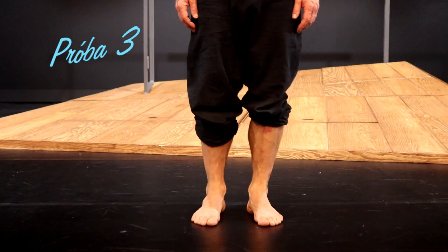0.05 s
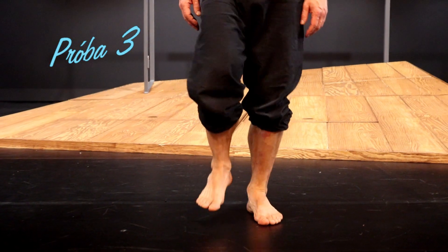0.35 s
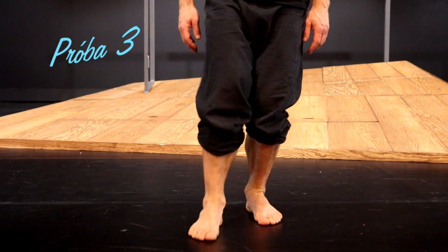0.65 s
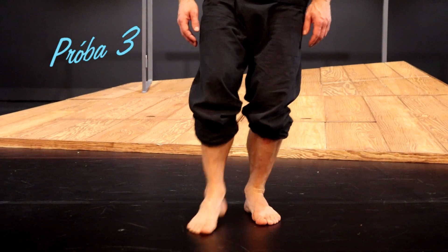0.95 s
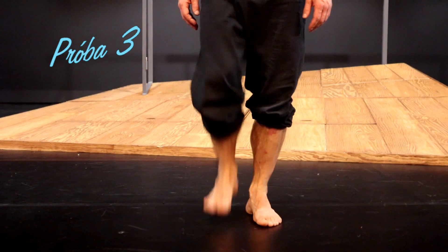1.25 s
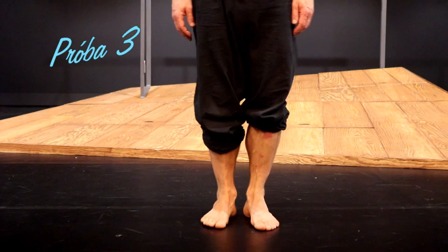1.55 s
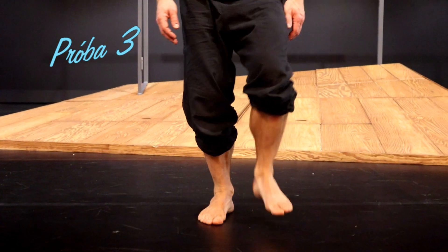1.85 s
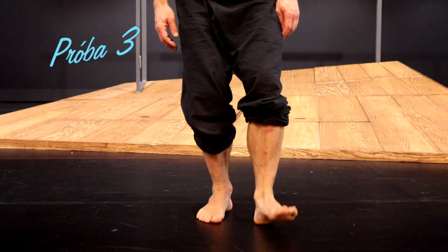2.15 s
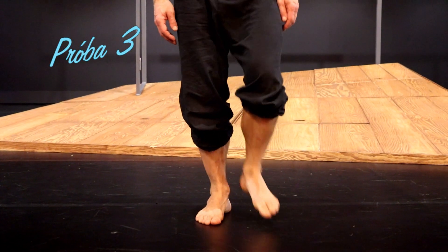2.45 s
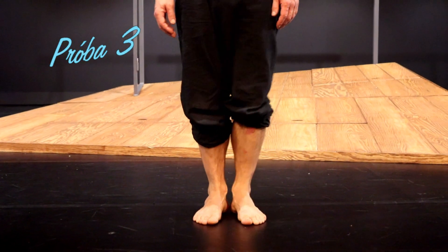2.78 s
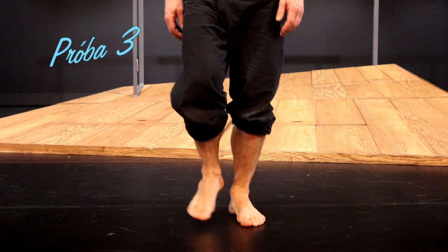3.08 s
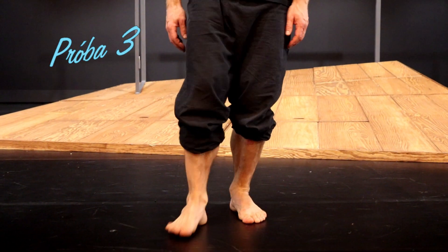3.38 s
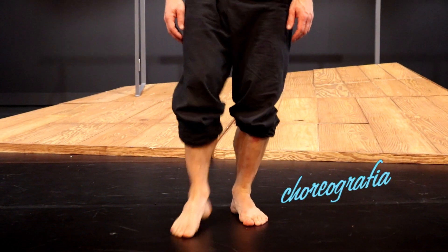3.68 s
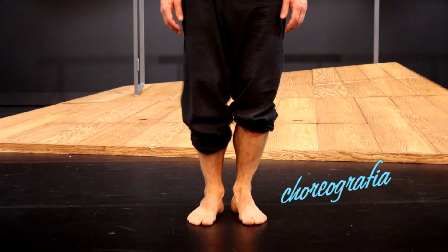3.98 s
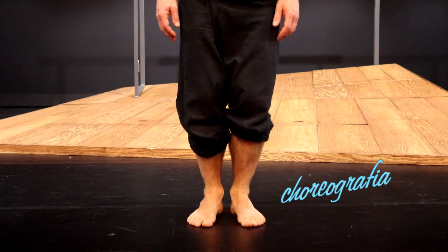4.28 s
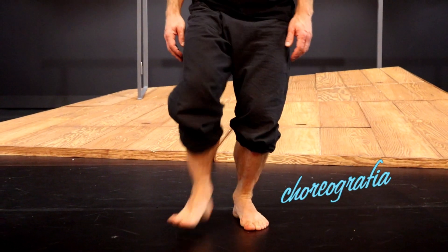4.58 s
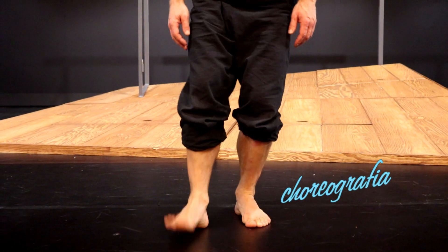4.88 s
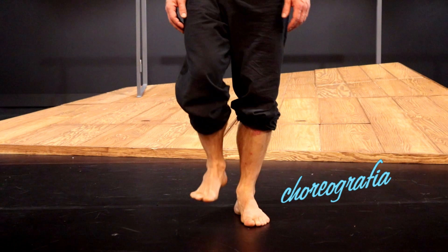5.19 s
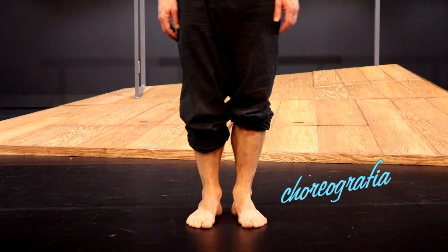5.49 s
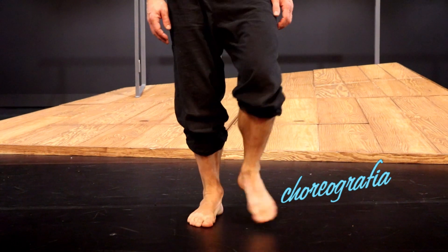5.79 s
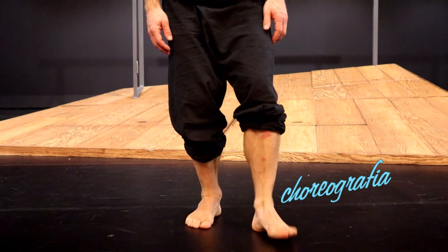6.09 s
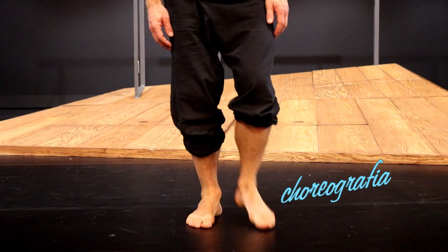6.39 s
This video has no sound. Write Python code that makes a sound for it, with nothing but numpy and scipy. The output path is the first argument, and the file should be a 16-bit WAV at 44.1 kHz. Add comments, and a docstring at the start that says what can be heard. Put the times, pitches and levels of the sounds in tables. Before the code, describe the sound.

A barefoot dancer repeats a three-beat figure five times on a sprung stage floor: a flat stamp, a lighter scuff, then a step into place. Skin slaps and pops sharply while the boards boom under the weight. Soft sole brushes and a few small creaks fall between the beats. The sound is close and in stereo, in a rehearsal room with about a second of reverberation and faint ventilation.

```python
"""Bare feet slap and boom on a sprung stage floor, close up and in stereo: one dancer repeats a three-beat
figure, a flat stamp forward, a scuff as the foot swings back, a step into place, then the other foot.
Skin slaps the mat and squeezes out pockets of air, the weight of the leg booms in the deck,
and a rehearsal room with a faint ventilation rush answers for about a second."""
import sys
import numpy as np
from scipy import signal
from scipy.fft import rfft, irfft, next_fast_len
from scipy.io import wavfile
from scipy.ndimage import uniform_filter1d

SR = 44100
rng = np.random.default_rng(int(sys.argv[2]) if len(sys.argv) > 2 else 0)


def transcribe(signal):
    """Save signal, clipped to [-1, 1], as a 16-bit WAV file at the path in sys.argv[1]."""
    frames = np.atleast_2d(signal).T
    limited = np.clip(frames, -1, 1)
    pcm = np.round(limited * 32767).astype(np.int16)
    wavfile.write(sys.argv[1], SR, pcm)


N = 292824
WEIGHT_LAG_S = 0.0062  # in stamps and scuffs the weight lands this long after the first slap


def amp(db):
    """Decibels to gain."""
    return 10 ** (np.asarray(db) / 20)


def unit(x):
    """x at rms 1."""
    return x / np.sqrt(np.mean(x ** 2) + 1e-20)


def per_ms(x):
    """x with the energy of one millisecond at full level."""
    return x / np.sqrt(np.sum(x ** 2) / (SR / 1000) + 1e-20)


def along(points, hz):
    """Read a curve of (f/Hz, value) points on a log frequency axis."""
    f, v = np.transpose(points)
    return np.interp(np.log(hz + 1), np.log(f), v)


def add(track, s, sound):
    """Mix a sound into the track at s seconds."""
    part = track[..., max(round(s * SR), 0):][..., :sound.shape[-1]]
    part += sound[..., :part.shape[-1]]


def filtered(x, response):
    """x through a frequency response."""
    n = x.shape[-1]
    m = next_fast_len(n + 8192)
    return irfft(rfft(x, m) * response(np.fft.rfftfreq(m, 1 / SR)), m)[..., :n]


def shaped(x, gain):
    """Minimum-phase EQ, so nothing rings ahead of an attack."""
    m = 2 * next_fast_len(len(x))
    cepstrum = irfft(np.log(gain(np.fft.rfftfreq(m, 1 / SR) + 1) + 1e-6))
    cepstrum[1:m // 2] *= 2
    cepstrum[m // 2 + 1:] = 0
    return irfft(rfft(x, m) * np.exp(rfft(cepstrum)))[:len(x)]


def coloured(x, points):
    """x through an EQ curve of (f/Hz, level/dB) points."""
    return shaped(x, lambda hz: amp(along(points, hz)))


def crackle(envelope, passes=6):
    """A random burst of energy 1, by turns flattened in spectrum and clipped to the envelope."""
    x = envelope * rng.standard_normal(len(envelope))
    limit = 2.5 * envelope / np.linalg.norm(envelope)
    for _ in range(passes):
        x = irfft(np.exp(1j * np.angle(rfft(x))), len(x))
        x = np.clip(x, -limit, limit)
    return x / np.linalg.norm(x)


def diffuse(n):
    """White stereo noise as a room delivers it: alike in the bass, unrelated in the treble."""
    # stereo image of the room: f/Hz, left-right correlation
    likeness = [(60, 1), (290, 0.92), (640, 0.72), (1400, 0.27), (3000, 0)]
    angle = lambda hz: np.arccos(np.clip(along(likeness, hz), -1, 1)) / 2
    spread = lambda hz: np.array([np.cos(angle(hz)), np.sin(angle(hz))])
    mid, side = filtered(rng.standard_normal((2, n)), spread)
    return np.array([mid + side, mid - side])


def ventilation(level_db=-50):
    """Room tone: a faint, steady rush of air."""
    # colour of the rush: f/Hz, level/dB
    rush_eq = [(12, -54), (20, -6), (120, -1), (285, -7.5), (446, -8.5), (485, -5.5), (527, -8.5),
               (759, -17), (849, -17.5), (2320, -21.5), (2750, -24.5), (3160, -21), (16000, -36.5)]
    return amp(level_db) * unit(filtered(diffuse(N), lambda hz: amp(along(rush_eq, hz))))


def in_room(sound, room_db=0, build_up_s=0.031, early_t60=0.039, wall_s=0.151, wall_db=-3, wall_t60=0.19):
    """A close sound, its early scatter and the room's tail, which is new for every spot on the floor."""
    # decay of the tail: f/Hz, t60/s
    tail_t60 = [(50, 1.15), (200, 1.13), (600, 0.83), (2000, 0.87), (4000, 0.87), (8000, 0.7), (15000, .36)]
    # colour of the tail: f/Hz, level/dB
    tail_eq = [(40, -1.5), (200, -6.5), (500, -5), (800, -1.5), (1100, 0), (2200, -7), (4500, -8.5),
               (8000, -15), (15000, -17.5)]
    # scatter off floor and legs: f/Hz, level/dB
    early_eq = [(200, -10.5), (750, -2.5), (1100, 4), (1600, 0.5), (2100, -8), (4000, -5.5), (15000, -21)]
    # colour mismatch of the two microphone ports: f/Hz, left minus right/dB
    balance = [(60, 1), (900, 1.4), (1900, -1), (3300, -4.5), (4800, 4), (7500, -2.5), (10000, 1.5),
               (13000, -10.5), (15000, -4)]
    hz, t, noise = signal.stft(diffuse(SR), SR, nperseg=256)

    def decay(eq, t60):
        return amp(along(eq, hz)[:, None] - 60 * t / t60) * np.sqrt(2 * np.log(1000) / (t60 * SR))

    late = amp(room_db) * decay(tail_eq, along(tail_t60, hz)[:, None]) * (1 - np.exp(-t / build_up_s))
    late *= np.hypot(1, amp(wall_db - 60 * np.abs(t - wall_s) / wall_t60))  # the far wall answers
    early = decay(early_eq, early_t60) * (t > 0)
    impulse = signal.istft(noise * np.hypot(late, early), SR, nperseg=256)[1]
    heard = signal.fftconvolve(sound[None], impulse, axes=1)
    lead_s = 0.5 / SR  # the right port hears first
    log_ratio = lambda f: np.log(amp(along(balance, f))) - 2j * np.pi * f * lead_s
    add(heard, 0, filtered(sound, lambda f: np.exp(np.outer([0.5, -0.5], log_ratio(f)))))
    return heard


def creak(length):
    """A short run of slips rings a panel joint's two resonances."""
    # body of the joint: f/Hz, level/dB
    joint_eq = [(600, -31), (950, 0.5), (1110, 4), (1280, -9), (1470, 7), (1750, -6), (3500, -32)]
    slips = crackle(np.hanning(round(length * SR)))
    return unit(coloured(slips, joint_eq))


def brush(length, grain_db=3, pressure_db=2, attack=0.064, hold=2.8):
    """The sole slides in fine catches under uneven pressure, and lifts away."""
    # skin friction: f/Hz, level/dB
    friction_eq = [(300, -13), (1500, 6.5), (3000, 6.5), (5000, 2.5), (8000, 4.5), (12000, -5), (16000, -1)]
    n = round(length * SR)
    catches = unit(uniform_filter1d(rng.standard_normal(n), size=60))
    pressure = unit(uniform_filter1d(rng.standard_normal(n), size=500))
    friction = rng.standard_normal(n) * amp(grain_db * catches + pressure_db * pressure)
    progress = np.linspace(0, 1, n)
    stroke = (1 - np.exp(-progress / attack)) * np.cos(np.pi / 2 * progress ** hold) ** 2
    return unit(coloured(friction, friction_eq)) * unit(stroke)


def boom(push_db, length, ring_db, rattle_db, thump_db, rebound=0.41, boards_db=-4, linger_db=-12):
    """The deck dips under the foot, springs back and rings; a longer contact rings it darker."""
    # the deck's low modes: f/Hz, level/dB, t60/s
    deck_modes = [(30.1, -29.5, 4), (58.48, -15, 1.15), (76.9, -16, 1.66), (91.4, -12.5, 1.15),
                  (125.2, -16.5, 0.673), (178.8, -13.5, 0.45), (214.4, -12, 0.21), (267.8, -11, 0.56)]
    # dense modes of the boards: f/Hz, level/dB
    boards_eq = [(20, 3), (45, 2), (80, 2.5), (130, 0.5), (200, 3), (300, 2), (500, -8), (900, -1),
                 (3000, -32.5)]
    # the panel thumping under a flat sole: f/Hz, level/dB
    thump_eq = [(70, -19.5), (140, 1.5), (225, 3.5), (320, -4.5), (450, -13.5), (700, -21), (2000, -54)]
    # its loose edges chattering just after the blow: f/Hz, level/dB
    rattle_eq = [(100, -39), (300, 3.5), (560, 0.5), (780, -9), (1100, -2), (1500, -5.5), (2500, -12),
                 (5000, -26), (16000, -36)]
    t = np.arange(3 * SR // 2) / SR
    decay = lambda t60: amp(-60 * t / t60)
    lobe = lambda start, span: np.sin(np.pi * np.clip((t - start) / span, 0, 1)) ** 2
    push = rebound * lobe(length, 1.58 * length) - lobe(0, length)
    modes = np.zeros(len(t))
    for hz, db, t60 in deck_modes:
        gain = amp(db + rng.normal(0, 0.74))
        modes -= gain * decay(t60) * np.sin(2 * np.pi * hz * rng.normal(1, 0.01) * t)
    boards = unit(coloured(rng.standard_normal(len(t)), boards_eq))
    boards *= amp(boards_db) * (decay(t60=0.28) + amp(linger_db) * decay(t60=1.47))
    force = t * np.exp(-t / (length / 6))  # the heel bites fast and eases off slowly
    ring = signal.fftconvolve(modes + boards, force / force.sum())[:len(t)]
    rise = 1 - np.exp(-t / length)
    burst = crackle((rise * decay(t60=0.09))[:8192])
    thump = per_ms(coloured(burst, thump_eq))
    rattle = unit(coloured(rng.standard_normal(len(t)), rattle_eq)) * decay(t60=0.28) * rise
    blow = amp(push_db) * push + amp(ring_db) * ring + amp(rattle_db) * rattle
    add(blow, 0, amp(thump_db) * thump)
    return blow


def slap(length, pocket_hz, knock_db, pop_db, snap_db, tilt_db, width_hz=600, pop_top_hz=4800,
         overtone=1.61, overtone_db=-11, linger_db=-28, linger_t60=0.062):
    """Skin closes on the mat in a short crackle: a low knock, a pop of trapped air, a bright snap."""
    # knock of the mat: f/Hz, level/dB
    knock_eq = [(60, -29), (250, 7), (400, -4), (580, 3.5), (800, -9), (1300, -7), (4000, -78)]
    # snap of the skin, before tilt_db per octave is added: f/Hz, level/dB
    snap_eq = [(500, -41), (2500, -5.5), (4800, 1), (6200, 2), (7700, 3.5), (10000, -2.5), (16000, -10.5)]
    t = np.arange(4096) / SR
    u = t / (length / 4)
    closing = crackle(u * np.exp(1 - u) + amp(linger_db - 60 * t / linger_t60), passes=3)

    def tone(f):
        mode = lambda hz: 1 / np.hypot(1, (f - hz ** 2 / f) / width_hz)
        pocket = np.hypot(mode(pocket_hz), amp(overtone_db) * mode(overtone * pocket_hz))
        octaves = np.log2(np.maximum(f, snap_eq[0][0]))
        knock = amp(knock_db) * unit(amp(along(knock_eq, f)))
        pop = amp(pop_db) * unit(pocket / np.hypot(1, (f / pop_top_hz) ** 4))
        snap = amp(snap_db) * unit(amp(along(snap_eq, f) + tilt_db * octaves))
        return np.linalg.norm([knock, pop, snap], axis=0)

    return shaped(per_ms(closing), tone)


def weight_shifts(pocket_width_hz=340, leak_hz_per_s=110000):
    """Small foley around the beats: heels sink, soles pop and brush, and a panel joint creaks."""
    # a heel sinks without a slap: t/s, push/dB, contact/s, ring/dB, rattle/dB, thump/dB
    heels = [(0.247, -39, 0.0029, -48, -48.5, -27.5), (1.915, -31, 0.0188, -13, -65, -46),
             (2.757, -8.5, 0.007, -31, -35.5, -21), (4.401, -12, 0.0113, -12, -29.5, -12),
             (5.442, -18.5, 0.0072, -18, -34, -24.5)]
    # air escapes a rolling or peeling sole: t/s, length/s, pocket/Hz, pop/dB, snap/dB, room/dB
    pops = [(0.207, 0.011, 2020, -29.5, -40.5, 8.5), (0.293, 0.0041, 2390, -31, -43, -11),
            (.5605, 0.0019, 1790, -49, -54, -8), (1.456, .0041, 1420, -36, -30, -2),
            (1.478, .0024, 1290, -7, -52, -3.5), (1.4797, 0.0077, 2600, -21, -48, 16),
            (1.7115, .003, 2600, -33.5, -36, -9), (1.741, .003, 1940, -32, -54, -1.5),
            (1.786, 0.0126, 1800, -43.5, -38.5, 15.5), (2.829, 0.0078, 2520, -39, -36.5, 13.5),
            (3.029, 0.02, 3500, -42, -39, 12), (3.145, 0.017, 1587, -46, -44, -3),
            (4.171, 0.0033, 4320, -26.5, -26, -3), (4.41, 0.039, 3350, -28, -55, 12),
            (5.759, 0.011, 2110, -31, -64, 6)]
    # a sole brushes the mat: t/s, length/s, level/dB
    brushes = [(.169, 0.19, -58.5), (1.691, .13, -58), (4.069, 0.12, -48.5), (5.707, 0.052, -51.5),
               (5.74, 0.18, -59.5)]
    # the joint slips: t/s, length/s, level/dB
    creaks = [(2.773, 0.028, -43), (3.949, 0.037, -53.5), (4.138, 0.032, -44), (4.424, 0.02, -34)]
    for s, *blow in heels:
        yield s, in_room(boom(*blow))
    for s, length, pocket_hz, pop, snap, room in pops:
        width = pocket_width_hz + leak_hz_per_s * length  # a slow pocket leaks and rings more broadly
        yield s, in_room(slap(length, pocket_hz, pop - 14, pop, snap, tilt_db=-4, width_hz=width), room)
    for s, length, db in brushes:
        yield s, in_room(amp(db) * brush(length))
    for s, length, db in creaks:
        yield s, in_room(amp(db) * creak(length))


def steps(settle_lag_s=0.0092, settle_db=-12, load_s=0.0024, softening=0.59):
    """Third beat: a dry knock that traps little air; the later the weight, the softer it loads the deck."""
    # the foot is set down: t/s, contact/s, pocket/Hz, knock/dB, snap/dB, tilt/(dB per octave), room/dB,
    # weight lag/s, push/dB, ring/dB, thump/dB
    cues = [(1.4094, 0.0024, 1970, -19, -15, -5, 4, .0024, -18.5, -18, -12.5),
            (2.7395, 0.005, 910, -15.5, -22, -4, -4, 0.00016, -7.5, -21, -9.5),
            (4.0515, 0.0015, 1570, -13.5, -13.5, 7.5, -1, 0.0047, -27, -18, -15.5),
            (4.381, 0.0033, 1830, -19.5, -22, .5, 7, .0068, -7, -10.5, -6.5),
            (5.4183, .0012, 1460, -16.5, -12, 1, -0.5, 0.0011, -26, -30.5, -23)]
    for s, length, pocket_hz, knock, snap, tilt, room, lag, push, ring, thump in cues:
        levels = np.array([knock, knock - 6, snap])  # knock, pop, snap
        yield s, in_room(slap(length, pocket_hz, *levels, tilt), room)
        settle = slap(0.00386, pocket_hz, *(levels + settle_db), tilt_db=-2)  # a second, softer touch
        yield s + settle_lag_s, in_room(settle, room_db=0.5)
        weight = boom(push, load_s + softening * lag, ring, rattle_db=thump - 21.5, thump_db=thump)
        yield s + lag, in_room(weight)


def scuffs(skim_s=0.045, skim_db=-55, slide_s=0.13, load_s=0.004):
    """Second beat: the toes skim, the ball slaps with little weight behind it, the sole slides away."""
    # the ball glances off the mat: t/s, contact/s, pocket/Hz, pop/dB, snap/dB, load/dB, slide/dB, room/dB
    cues = [(1.037, 0.0082, 1920, -17, -22, -26, -46, 2), (2.412, 0.0073, 2620, -21, -26.5, -23, -51, -3.5),
            (3.714, 0.0062, 2420, -12, -18.5, -28.5, -55, 0.5),
            (5.055, 0.006, 2450, -21.5, -36, -33.5, -49, -.5),
            (6.41, 0.0091, 1590, -29, -28, -28.5, -52, -6.5)]
    for s, length, pocket_hz, pop, snap, load, slide, room in cues:
        yield s - skim_s, in_room(amp(skim_db) * brush(skim_s))
        ball = slap(length, pocket_hz, load - 0.1, pop, snap, tilt_db=-1.5, width_hz=750)
        yield s, in_room(ball, room)
        weight = boom(load + 1, load_s, ring_db=load, rattle_db=load - 16, thump_db=load + 8)
        yield s + WEIGHT_LAG_S, in_room(weight)
        yield s, in_room(amp(slide) * brush(slide_s))


def stamps(toe_s=0.00108, arch_s=0.0028, ball_share=0.864, load_s=0.0056):
    """First beat: toes tick, the ball slaps until the arch claps shut on its air, and the deck booms."""
    # the sole rolls down: t/s, toes to ball/s, toes to arch/s, pocket/Hz, ball pop/dB, arch pop/dB,
    # arch snap/dB, tilt/(dB per octave), room/dB, ring/dB, thump/dB
    cues = [(.678, 0.0097, .016, 2070, -12, -8, -17, 1, 1, -19.5, -13.5),
            (2.0756, .0115, .0143, 1970, -37, -13.5, -14, -5, -2.5, -16, -6),
            (3.3929, .0139, 0.017, 1960, -18.5, -10, -9.5, -5.5, 4, -11, -15.5),
            (4.754, .012, .0156, 1880, -12.5, -17.5, -8.5, -6.5, 2.5, -12, -11.5),
            (6.0736, 0.017, 0.019, 2110, -26, -6, -12, 4, 3.5, -12.5, -5.5)]
    for s, to_ball, to_arch, pocket_hz, ball_pop, arch_pop, snap, tilt, room, ring, thump in cues:
        toes = slap(toe_s, pocket_hz, knock_db=-31, pop_db=-37, snap_db=-26, tilt_db=-3.5)
        yield s, in_room(toes, room)
        ball_s = max(ball_share * (to_arch - to_ball), toe_s)
        ball = slap(ball_s, pocket_hz, knock_db=-18.5, pop_db=ball_pop, snap_db=-16, tilt_db=-5.5)
        yield s + to_ball, in_room(ball, room + 3)
        arch = slap(arch_s, pocket_hz, knock_db=-21, pop_db=arch_pop, snap_db=snap, tilt_db=tilt)
        yield s + to_arch, in_room(arch, room)
        weight = boom(ring - 4.5, load_s, ring, rattle_db=thump - 19, thump_db=thump)
        yield s + WEIGHT_LAG_S, in_room(weight)


def scene():
    """All the footwork in the room, over the ventilation."""
    mix = ventilation()
    for s, sound in [*stamps(), *scuffs(), *steps(), *weight_shifts()]:
        add(mix, s, sound)
    return mix


def record(dry, low_cut_hz=26, top_hz=16000):
    """The camera drops the deepest bass, clips at full scale and cuts the top octave's edge steeply."""
    x = filtered(dry, lambda hz: 1j * hz / (low_cut_hz + 1j * hz))
    return filtered(np.clip(x, -1, 1), lambda hz: 1 / np.sqrt(1 + (hz / top_hz) ** 160))


dry = scene()
out = record(dry)
transcribe(out)
```